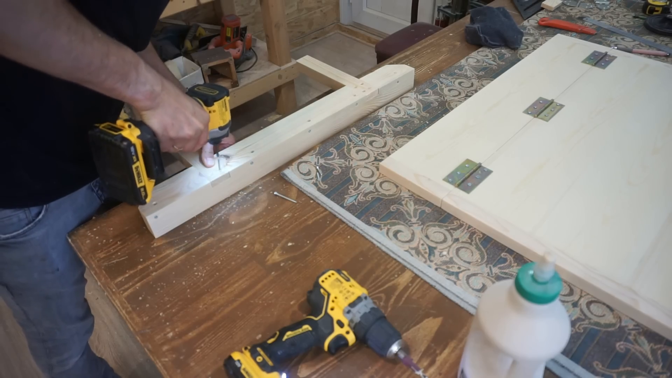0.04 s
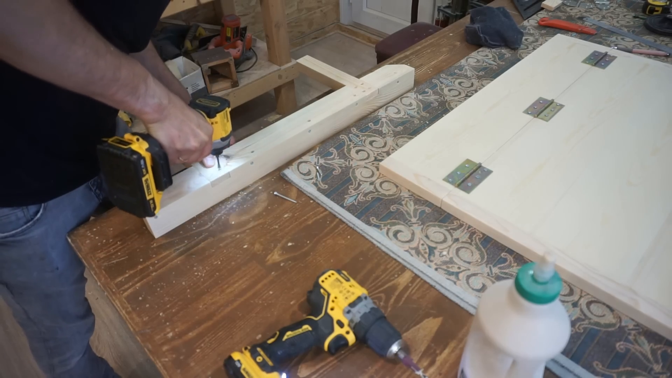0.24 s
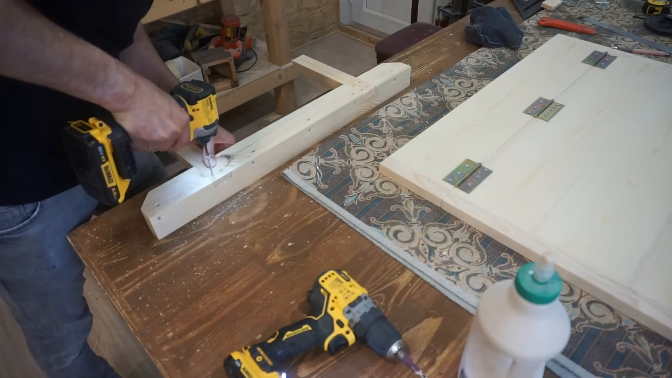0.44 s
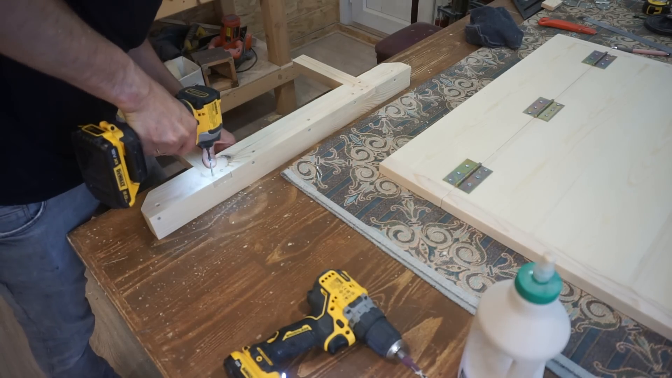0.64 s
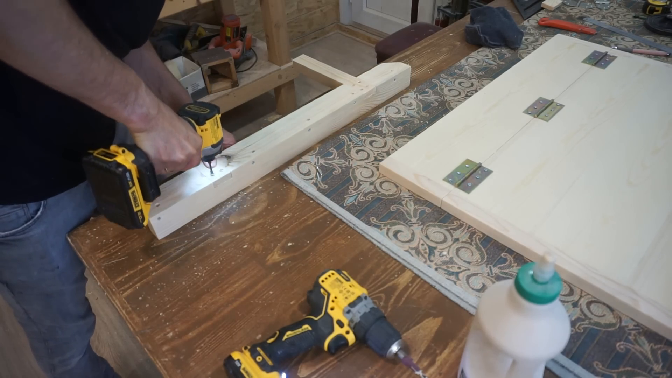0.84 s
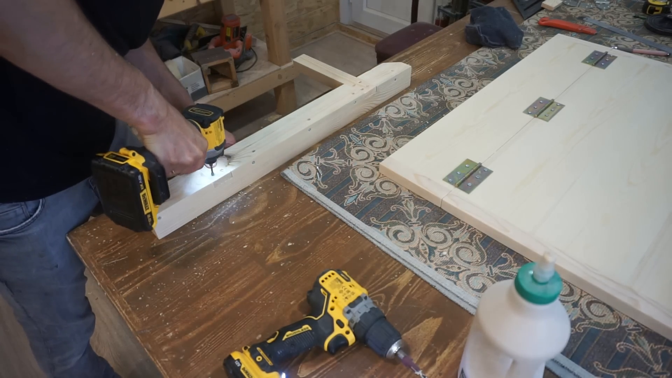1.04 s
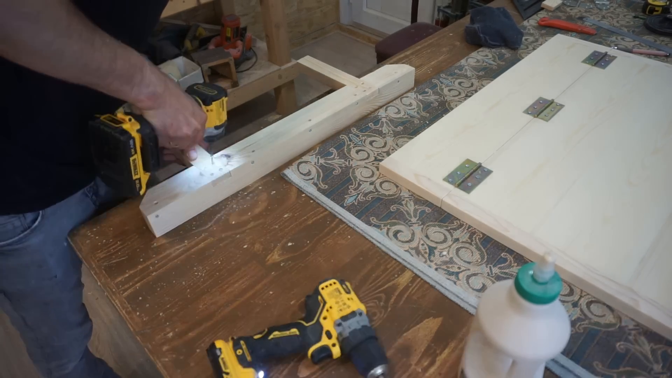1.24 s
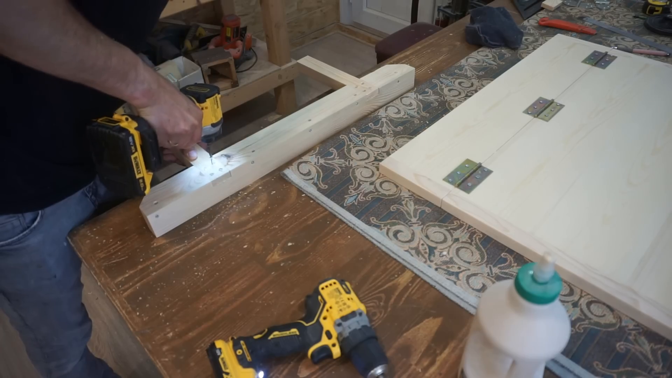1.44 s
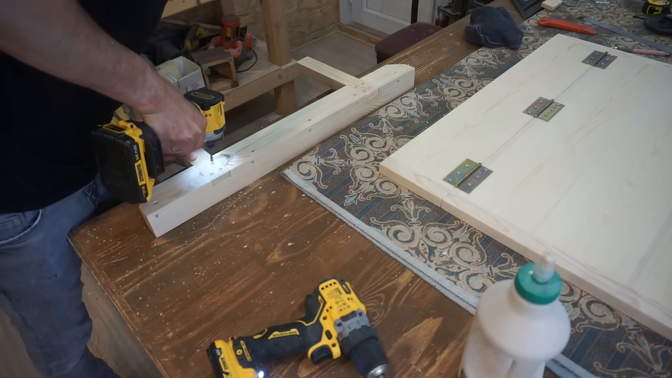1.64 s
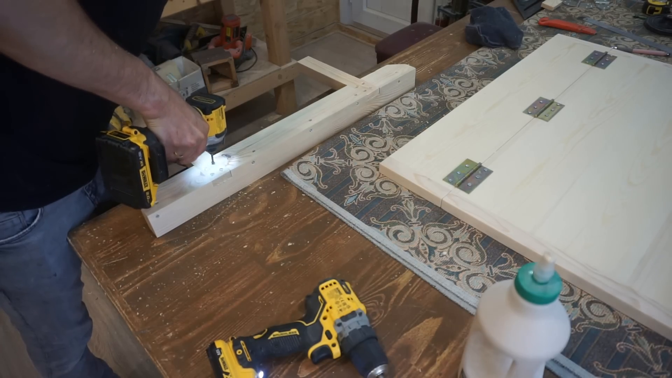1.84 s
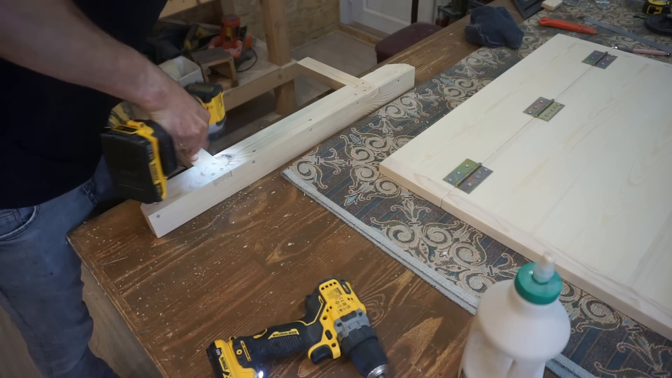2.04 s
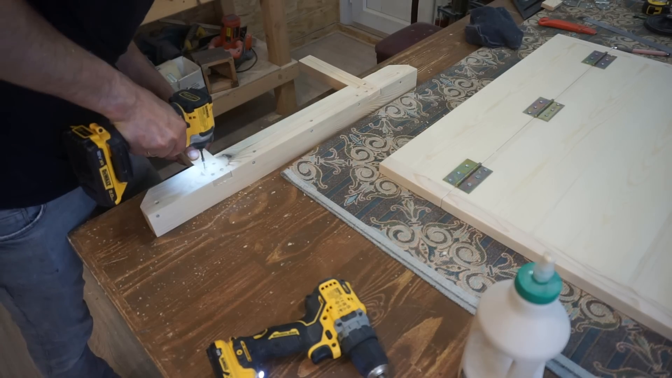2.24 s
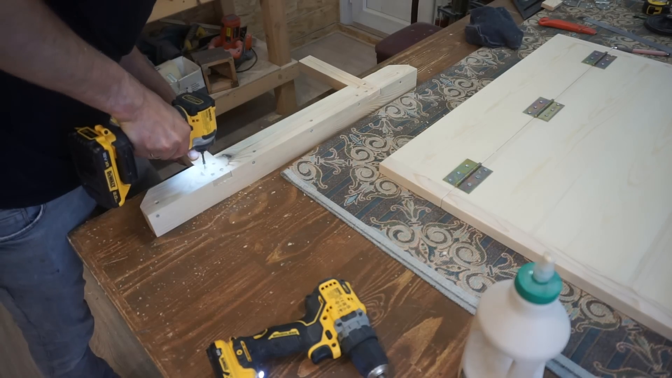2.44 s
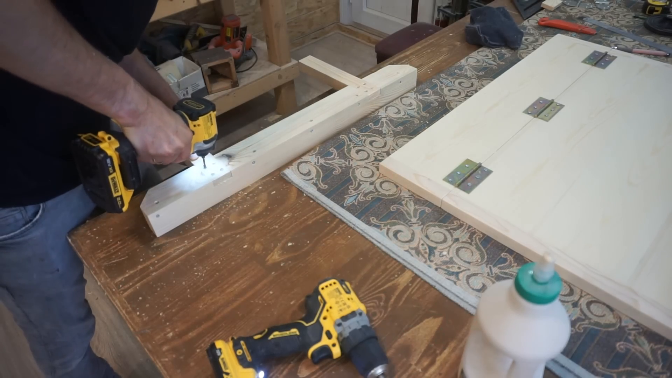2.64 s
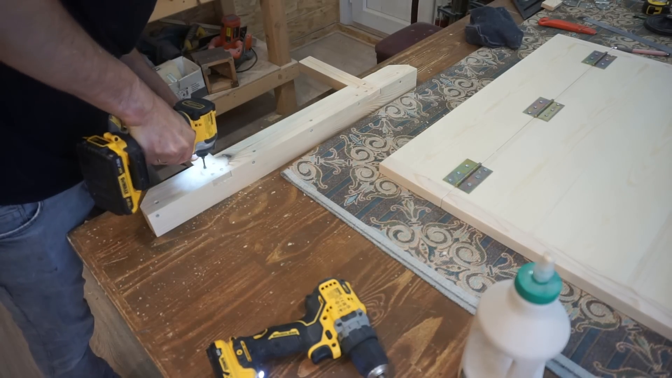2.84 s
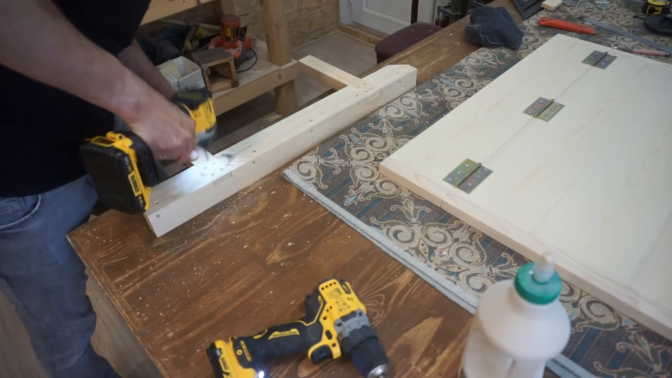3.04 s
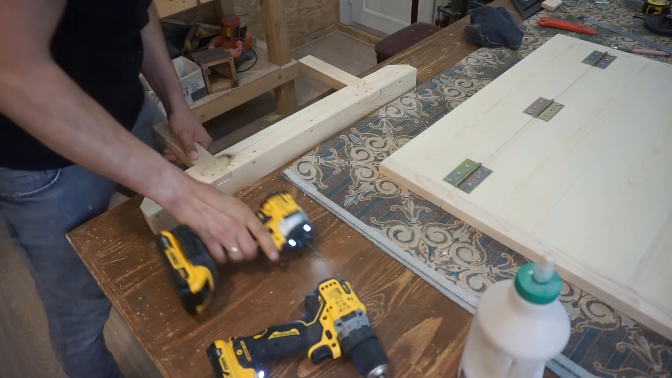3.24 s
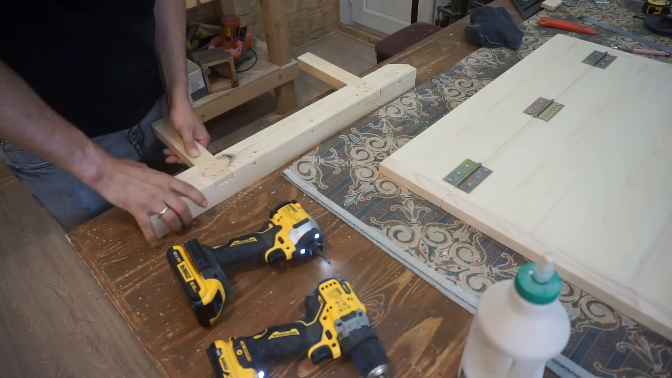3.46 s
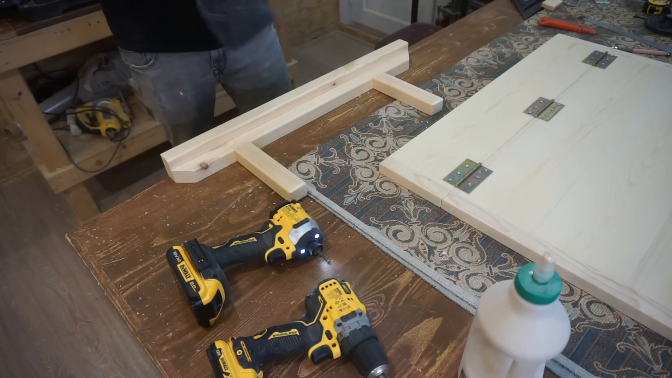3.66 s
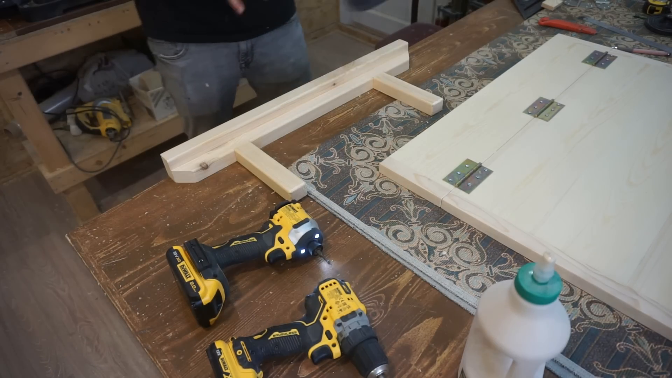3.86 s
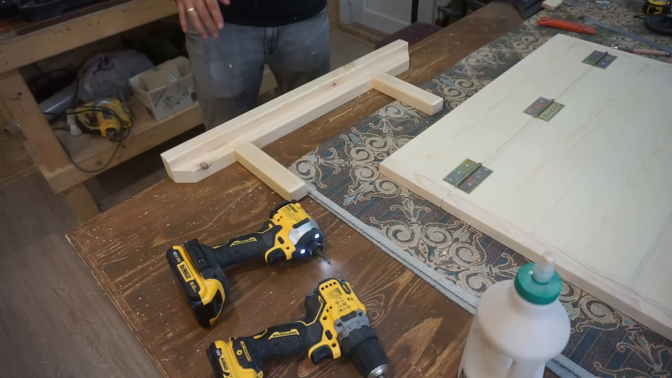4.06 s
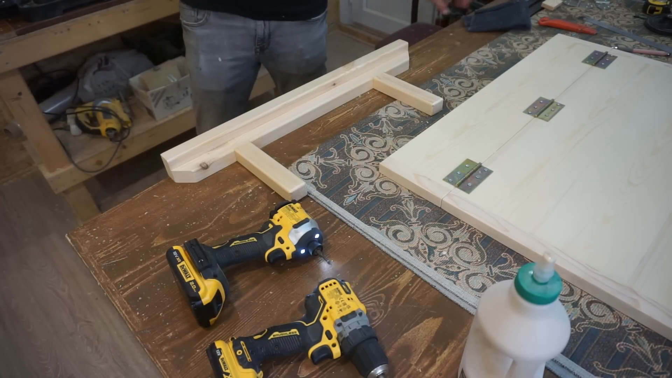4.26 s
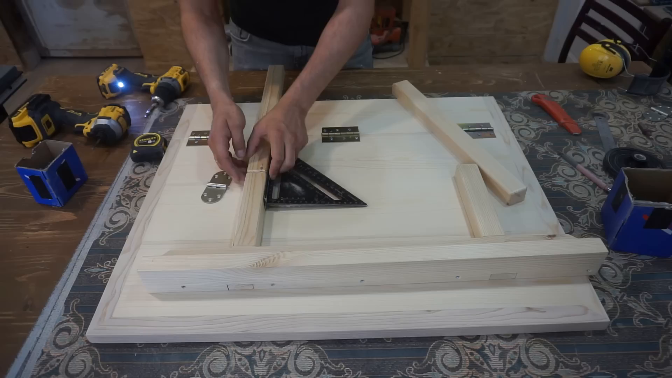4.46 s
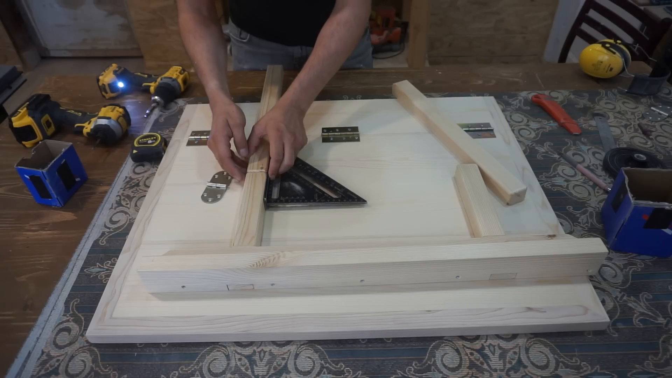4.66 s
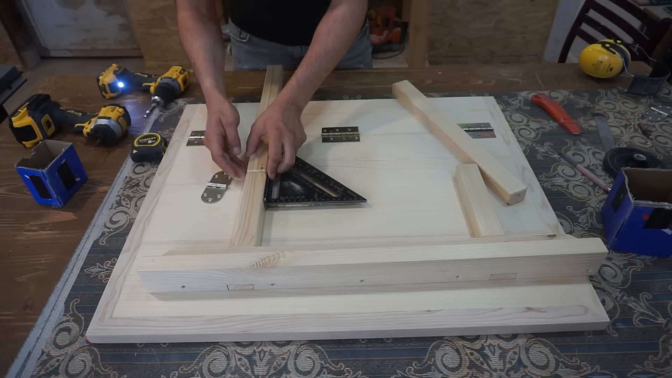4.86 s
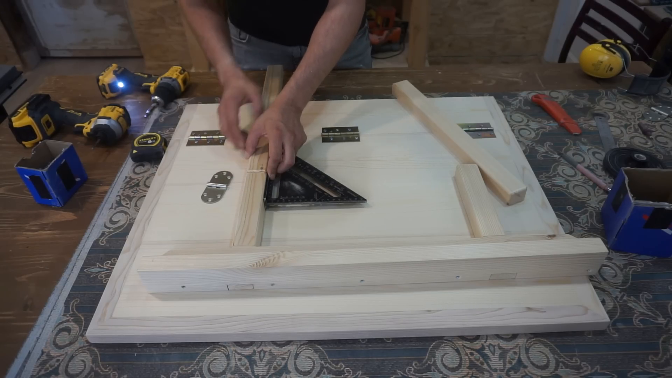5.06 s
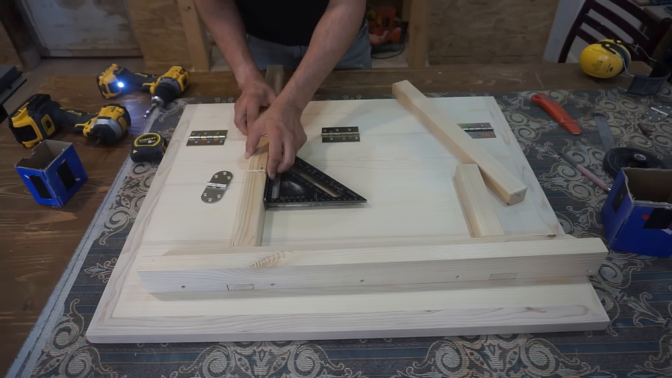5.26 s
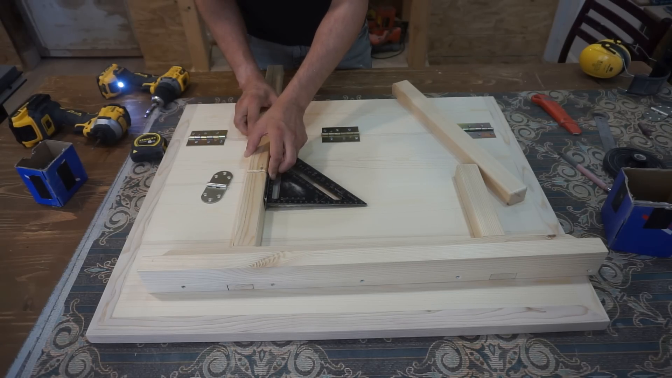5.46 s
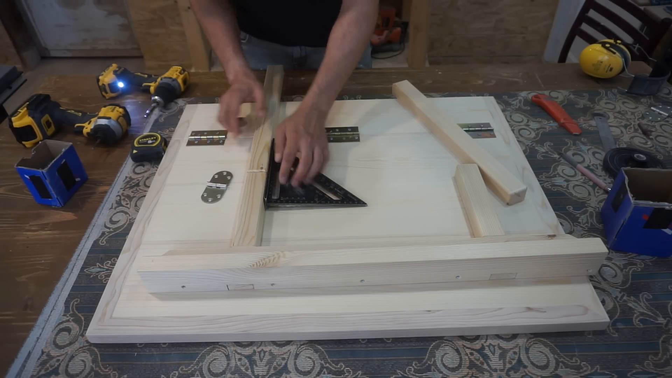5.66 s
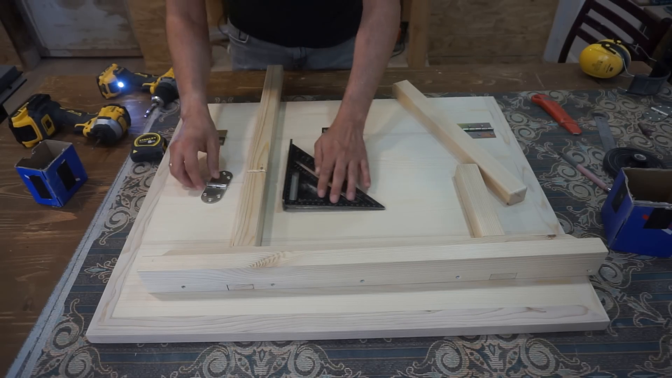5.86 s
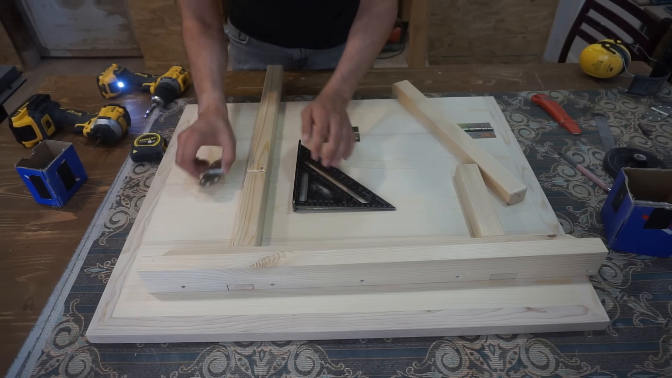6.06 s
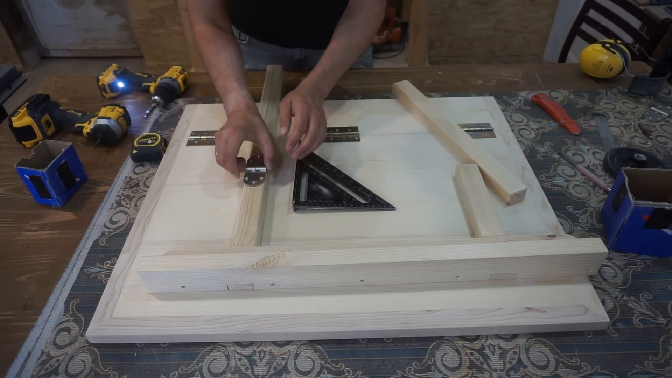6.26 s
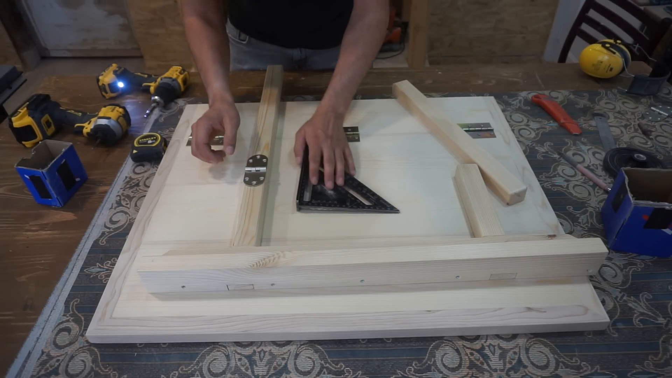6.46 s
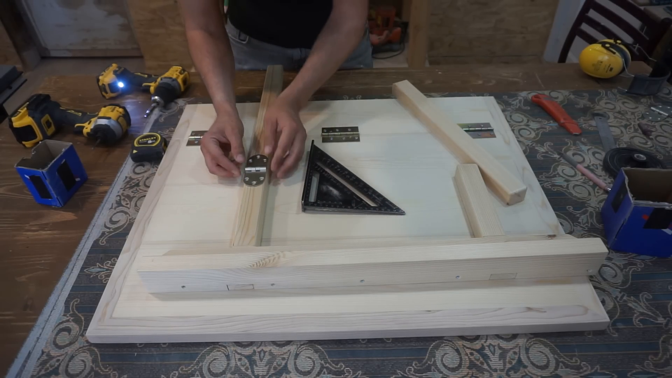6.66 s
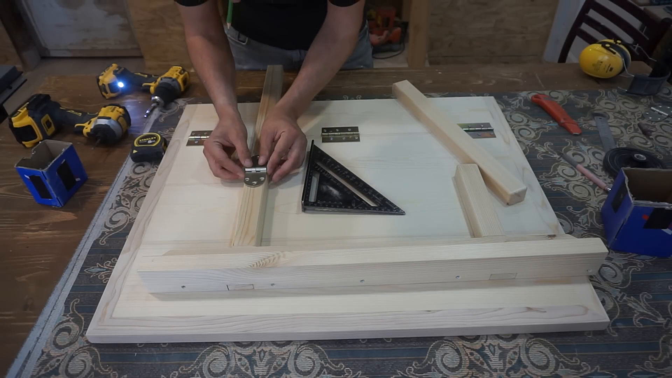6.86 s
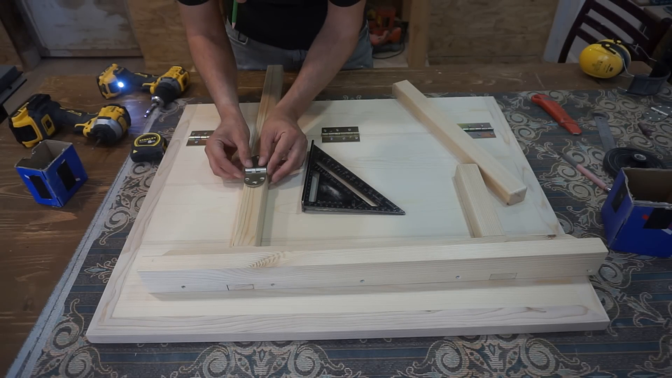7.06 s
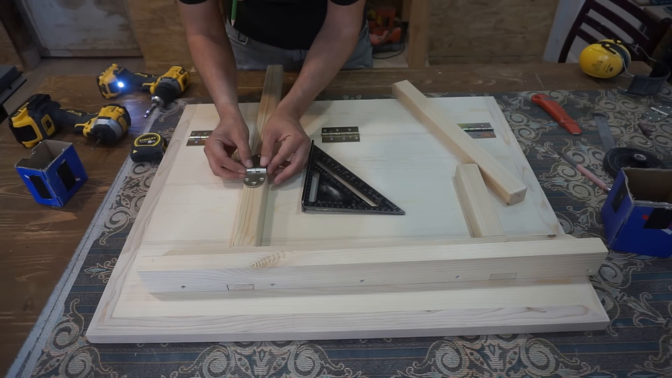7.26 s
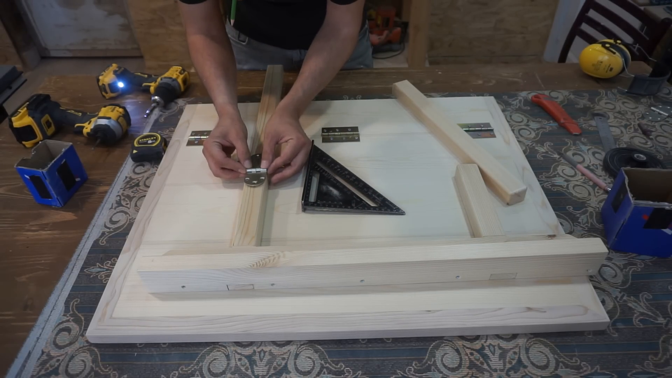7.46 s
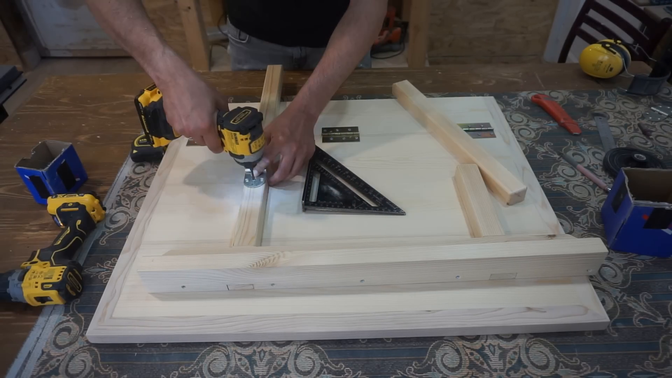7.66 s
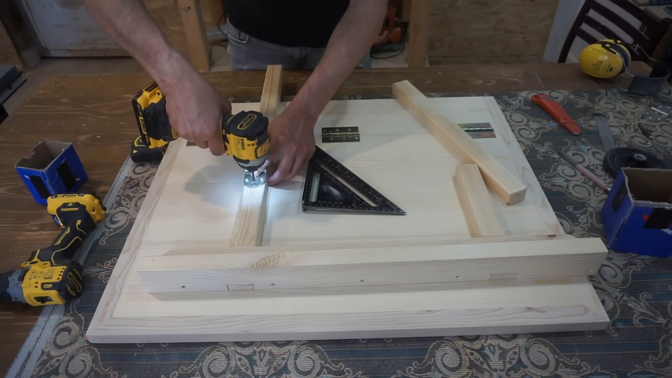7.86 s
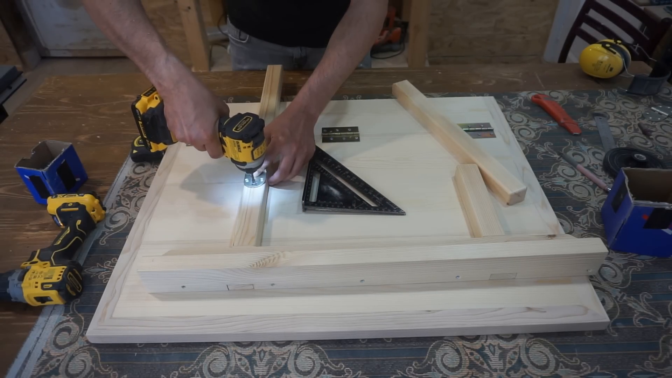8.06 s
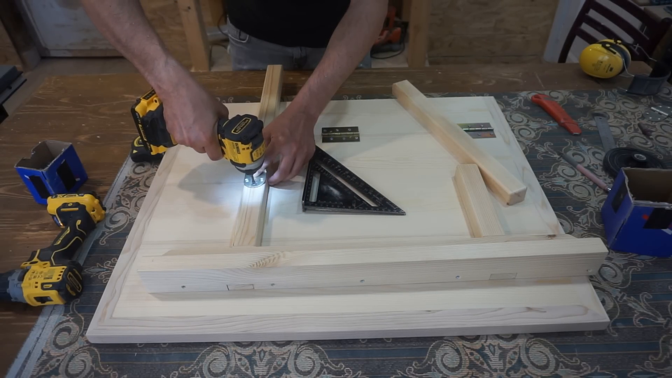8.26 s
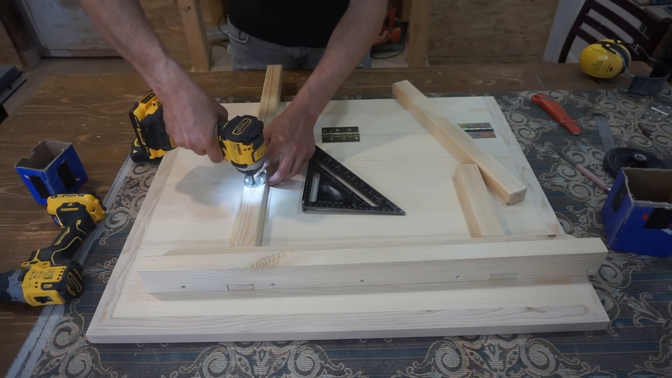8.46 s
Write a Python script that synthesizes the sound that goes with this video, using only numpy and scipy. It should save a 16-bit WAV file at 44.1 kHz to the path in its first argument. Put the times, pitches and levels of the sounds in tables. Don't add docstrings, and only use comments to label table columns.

```python
import sys
import numpy as np
from scipy import signal
from scipy.fft import rfft, irfft, next_fast_len
from scipy.io import wavfile
from scipy.ndimage import uniform_filter1d, map_coordinates

SR = 44100
rng = np.random.default_rng(int(sys.argv[2]) if len(sys.argv) > 2 else 0)


def gain_from_db(level_db):
    decades = np.asarray(level_db, float) / 20
    return 10 ** decades


def to_wav(sig):
    pcm = np.clip(np.atleast_2d(sig), -1, 1) * 32767
    pcm = np.round(pcm).astype(np.int16)
    wavfile.write(sys.argv[1], SR, pcm.T)


N = 375291
TIME = np.arange(N) / SR


def unit(x):
    return x / np.sqrt(np.mean(x ** 2) + 1e-20)


def along(points, hz):
    f, v = np.transpose(points)
    return np.interp(np.log(hz + 1), np.log(f + 1), v)


def played(tables):
    s, *cols = np.transpose(np.concatenate(tables))
    on = sum((TIME >= rows[0][0]) & (TIME < rows[-1][0]) for rows in tables)
    gate = uniform_filter1d(np.minimum(on, 1.), size=200)
    return [np.interp(TIME, s, c) for c in cols] + [gate]


def wobble(rate, times=TIME):
    knots = rng.standard_normal((2, int(N / SR * rate) + 4))
    return np.array([map_coordinates(k, [times * rate]) for k in knots])


def filtered(x, response):
    m = next_fast_len(x.shape[-1] + 8192)
    return irfft(rfft(x, m) * response(np.fft.rfftfreq(m, 1 / SR)), m)[..., :x.shape[-1]]


def modes(peaks):
    def response(f):
        return sum((-1) ** k * gain_from_db(db) * 1j * f * width / (hz * hz - f * f + 1j * f * width)
                   for k, (hz, width, db) in enumerate(peaks))
    return response


def grit(shape, spread_db):
    return unit(rng.standard_normal(shape) * gain_from_db(spread_db * rng.standard_normal(shape)))


def held(rows, rise_db=1800, fall_db=349):
    t = TIME[::16]
    shapes = [np.interp(t, [start - 1, start, stop, stop + 1],
                        [first_db - rise_db, first_db, last_db, last_db - fall_db])
              for start, stop, first_db, last_db in rows]
    return np.interp(TIME, t, gain_from_db(np.max(shapes, axis=0)))


def driver():
    # start_s, mesh_hz
    fast_mesh = [
        [(0, 2046), (.045, 1937), (.1, 1850), (.19, 1778)],
        [(0.195, 4169), (0.225, 4560), (0.309, 4310), (0.335, 4230)],
        [(0.572, 3956), (0.604, 4310), (0.618, 4430)],
        [(0.722, 3546), (0.74, 4510), (0.756, 4687), (0.814, 4430), (0.912, 4160), (0.955, 3948)],
        [(1.625, 2470), (1.643, 2685), (1.661, 2830), (1.807, 2573), (1.83, 2425)],
        [(2.44, 1735), (2.464, 1908), (2.56, 1811), (2.62, 1637), (2.72, 1585), (2.75, 1204), (2.775, 950)],
    ]
    fast_db = [-24, -21.5, -25, -24, -25.5, -23]
    # start_s, mesh_hz
    slow_mesh = [
        [(2.26, 608), (2.31, 596), (2.42, 561), (2.45, 564)],
        [(7.775, 614.3), (7.85, 597.4), (7.926, 573), (8.02, 555), (8.19, 531), (8.304, 499), (8.444, 431.7),
         (8.51, 386.3)],
    ]
    slow_db = [-33, -35.5]
    # start_s, mesh_hz
    spindle_mesh = [[(1.65, 7050), (1.69, 7370), (1.81, 6560)]]
    # freq_hz, level_db (per Hz)
    housing = [(1500, -34.5), (2600, -6), (3200, -6.5), (4400, -5.5), (5800, -2), (8500, 1.5), (10000, -6),
               (13000, -9.5), (16000, -18.5)]
    # freq_hz, level_db
    whine_colour = [(1500, -14), (2800, -5), (4500, -1.5), (6200, -2), (8500, 2), (11000, -7.5),
                    (14000, -14), (16500, -49)]
    # freq_hz, level_db
    growl_colour = [(580, -10), (800, 7.5), (1150, 5.5), (1650, -4.5), (2150, 2.5), (3200, -8), (4300, 10),
                    (5200, -2), (7500, 1.5), (12000, -24)]
    # freq_hz, level_db (per Hz)
    rail = [(290, -28), (500, -9), (728, -9), (831, -2), (970, -5), (1200, 1), (1580, -8), (1940, 1),
            (3270, -5), (4450, -15), (7000, -23), (9100, -54), (15400, -120)]
    # freq_hz, width_hz, level_db
    housing_ring = [(4420, 1290, 0)]
    # freq_hz, width_hz, level_db
    bench_thrum = [(360, 327, -1), (530, 590, 0)]

    rush_gain, ring_gain, wood_gain, bench_gain = trigger()
    teeth = grit((2, N), 3.5)
    rush = rush_gain * gain_from_db(-2.5) * unit(filtered(teeth, lambda f: gain_from_db(along(housing, f))))
    ring = ring_gain * gain_from_db(-2.5) * unit(filtered(teeth, lambda f: modes(housing_ring)(f) ** 2))
    slips = gain_from_db(2.34 * wobble(160)[0]) * grit((2, N), 3.3)
    wood = wood_gain * gain_from_db(-3.0) * unit(filtered(slips, lambda f: gain_from_db(along(rail, f))))
    bench = bench_gain * gain_from_db(-3) * unit(filtered(slips, lambda f: modes(bench_thrum)(f) ** 2))

    gears = whine(fast_mesh, fast_db, whine_colour, offset_db=0.5, flutter=0.32, rough=0.55, count=8,
                  late_db=6, late_s=0.029)
    gears += whine(slow_mesh, slow_db, growl_colour, offset_db=9, flutter=0.11, rough=0.25, count=20,
                   late_db=15, late_s=0.1)
    gears += whine(spindle_mesh, [-32], whine_colour, offset_db=-1.0, flutter=0.28, rough=0.3, count=1)
    return rush + ring + wood + bench + gears


def trigger():
    # start_s, stop_s, motor_start_db, motor_stop_db, wood_db
    full_pulls = [
        (0, .19, -28, -20, -35),
        (.195, .335, -28, -23, -34.5),
        (.555, .6, -21, -21.5, -30),
        (.713, .95, -23.5, -28.5, -36),
        (1.618, 1.645, -18, -19.5, -26),
        (1.645, 1.825, -27.5, -22.5, -35.5),
        (2.44, 2.76, -25, -24, -36.5),
    ]
    # start_s, stop_s, motor_start_db, motor_stop_db, wood_db
    half_pulls = [
        (1.385, 1.604, -31.5, -25.5, -32),
        (2.27, 2.446, -32, -25.5, -38),
        (2.904, 3.056, -32.5, -42.5, -37.5),
        (7.801, 8.521, -28.5, -26, -39),
    ]
    # start_s, stop_s, motor_start_db, motor_stop_db, wood_db
    touch = [
        (0.47, 0.478, -26.5, -18, -40.5),
    ]
    # start_s, stop_s, wood_start_db, wood_stop_db
    bites = [(0.561, 0.559, -18, -31), (.54, 0.553, -33.5, -39), (0.946, 1.001, -19, -17),
             (1.08, 1.16, -18, -22.5), (1.826, 1.889, -21, -18), (1.983, 1.995, -20.5, -38),
             (1.993, 2.062, -19, -18)]

    def motor(rows, **speed):
        return held([row[:4] for row in rows], **speed)

    def load(rows, **speed):
        return held([(start, stop, db, db) for start, stop, _, _, db in rows], **speed)

    cut_db = 4000
    full = motor(full_pulls)
    half = np.maximum(motor(half_pulls), motor(touch, fall_db=cut_db))
    thread = np.maximum(load(full_pulls + half_pulls), load(touch, fall_db=cut_db))
    bite = held(bites, rise_db=1600, fall_db=403)
    stall = held([(start, stop, db - 5, db - 5 - 10.5) for start, stop, db, _ in bites])
    idle = held([(start, stop, first, last - 11) for start, stop, first, last, _ in half_pulls + touch],
                fall_db=2 * 349)
    ring = gain_from_db(3.4 * wobble(14)[0]) * np.maximum(gain_from_db(-11) * full, gain_from_db(-2) * idle)
    thrum_db = np.where(TIME < 2.2, -5, -10.5)
    bench = gain_from_db(thrum_db + 3.3 * wobble(14)[0]) * thread
    return (np.max([full, half, stall], axis=0), np.maximum(ring, gain_from_db(-13) * bite),
            np.maximum(thread, bite), np.maximum(bench, gain_from_db(-13) * bite))


def whine(tables, levels_db, colour, offset_db, flutter, rough, count, late_db=0, late_s=1):
    mesh_hz, on = played(tables)
    starts = np.array([rows[0][0] for rows in tables])
    row = np.maximum(np.searchsorted(starts, TIME) - 1, 0)
    since = np.abs(TIME - starts[row])
    db = uniform_filter1d(np.asarray(levels_db, float)[row], size=200) - late_db * np.exp(-since / late_s)
    live = on > 0
    t, hz = TIME[live], mesh_hz[live]
    turns = 2 * np.pi * np.cumsum(hz) / SR
    slipping = 1 + 0.23 * np.clip(np.abs(np.gradient(np.log(hz))) * SR - 2.5, 0, 5)
    error = flutter * slipping * (wobble(70, t) + 2.1 * wobble(260, t))
    beat = gain_from_db(3.16 * wobble(45, t)) + rough * (wobble(400, t) + 0.14 * wobble(1600, t))
    sizes = [gain_from_db(along(colour, k * hz)) * (k * hz < SR / 2.7) for k in range(1, count + 1)]
    tones = 0
    for k, size in enumerate(sizes, 1):
        own_beat = np.roll(beat, k * SR // count // 2, axis=1)
        tones = tones + size * own_beat * np.sin(k * turns + k ** 0.64 * error + k * k)
    shaking = gain_from_db(0.5 * uniform_filter1d(slipping - 1, size=300))
    out = np.zeros((2, N))
    out[:, live] = shaking * tones / np.sqrt(np.sum(np.square(sizes), axis=0) / 2)
    return on * gain_from_db(db + offset_db) * out


def knocks():
    # start_s, peak_db, ring_hz, brightness_db, ring_db
    strikes = [(0.554, -23, 2340, -6, -1.5), (0.95, -26, 1140, -16, -12), (1.523, -21, 780, -3.5, -8),
               (1.826, -19, 1142, -23, -3), (2.226, -27, 1560, -12.5, -1.5), (2.824, -28, 605, -32, 2.5),
               (3.094, -30, 460, -15, 8), (3.093, -35, 4700, -8, 4), (3.349, -24.5, 562, -31, 18.5),
               (3.36, -13, 1080, -28, 10), (4.163, -41, 745, -18, -9), (4.584, -45.5, 547, -41, -1),
               (4.63, -57, 2190, -30, 14), (5.424, -9.5, 1300, -3.5, -2), (6.298, -30.5, 1210, -8.5, 1.5),
               (7.769, -35, 1180, -11, 5)]
    # freq_hz, level_db (per Hz)
    board = [(59, -70), (100, -30), (186, -24), (451, -2), (713, -2), (1130, -6.5), (1640, -10.5),
             (2560, -7.5), (3910, -22), (5000, -25), (6500, -43), (11000, -120)]
    out, t = np.zeros((2, N + SR)), np.arange(SR // 4) / SR
    for s, db, hz, bright_db, ring_db in strikes:
        shake = grit((2, len(t)), 1.35) * gain_from_db(-60 * np.maximum(t - 0.016, 0) / 0.15)
        shake += 2.1 * gain_from_db(-60 * t / 0.008) * rng.standard_normal(len(t))
        part = modes([(hz, 0.4 * hz, 0)])
        body = filtered(shake, lambda f: gain_from_db(along(board, f)) + gain_from_db(ring_db) * part(f) ** 2)
        crack = filtered(shake, lambda f: 1j * f / (1j * f + 3000) * (7000 / (1j * f + 7000)) ** 2)
        knock = unit(body) + gain_from_db(bright_db - 0.5) * unit(crack)
        out[:, round(s * SR):][:, :len(t)] += gain_from_db(db - 13.0) * knock
    return out[:, :N]


def slides():
    # start_s, stop_s, start_db, stop_db
    pushes = [
        (5.85, 5.89, -38, -38.5),
        (5.915, 5.975, -32.5, -34),
        (6.495, 6.57, -40, -37),
    ]
    # freq_hz, width_hz, level_db
    slid_wood = [(1090, 126, -0.5), (1375, 81, -3), (1840, 520, -13), (2330, 46, -10), (2510, 120, -13)]
    # freq_hz, width_hz, level_db
    hinge = [(3640, 110, -15), (4350, 45, -2), (4670, 110, -7), (5620, 28, 0), (5930, 28, -4),
             (7130, 150, -11), (7640, 71, -6), (8850, 54, -8), (10600, 26, -4), (12900, 50, 0.5)]
    drag = gain_from_db(0.34 * wobble(60)[0]) * grit((2, N), 2.9)
    wood = unit(filtered(drag, modes(slid_wood)))
    metal = unit(filtered(drag, lambda f: modes(hinge)(f) + 0.026))
    return held(pushes, rise_db=280, fall_db=502) * (wood + gain_from_db(-9.5) * metal)


def room(x, wet_db):
    # freq_hz, t60_s
    decay = [(200, 0.22), (1000, 0.21), (4000, 0.15), (12000, 0.12)]
    hz, t, z = signal.stft(rng.standard_normal((2, SR // 3)), SR, nperseg=256)
    tail = signal.istft(z * gain_from_db(-60 * t / along(decay, hz)[:, None]), SR, nperseg=256)[1]
    tail /= np.linalg.norm(tail[0])
    late = np.pad(x, ((0, 0), (150, 0)))
    return x + gain_from_db(wet_db) * signal.oaconvolve(late, tail, axes=1)[:, :N]


def thumps():
    # start_s, peak_db
    low_thumps = [
        (1.304, -60),
        (4.484, -58),
        (7.7, -66),
        (8.496, -46),
    ]
    out, t = np.zeros(N + SR), TIME[:SR // 20]
    for s, db in low_thumps:
        out[round(s * SR):][:len(t)] += gain_from_db(db + 14 - 60 * t / 0.0065)
    return out[:N]


def floor():
    # freq_hz, width_hz, level_db
    machine = [(437.4, 16.4, -5), (657, 85, -2.5), (1324, 140, 7), (2606, 190, -7), (4540, 63, -9)]
    # freq_hz, level_db (per Hz)
    air_colour = [(40, -55), (100, -19), (390, -13.5), (700, -4.5), (1300, 7.5), (2600, -5.5), (16000, -6)]
    # start_s, buzz_db
    lift = [(0, -66), (1.3, -57.5), (2.2, -59), (3.17, -60.5), (3.45, -60.5), (3.74, -57.5), (4.1, -53.5),
            (4.485, -52), (4.49, -60), (5.0, -58.5), (5.4, -55.5), (5.9, -52), (6.3, -53.5), (6.66, -52.5),
            (7.69, -54), (7.7, -56.5), (8.51, -59)]
    buzz_hz = 50
    buzz_db, _ = played([lift])
    hum_mode, frame_mode, panel, *small = machine
    at = np.round((np.arange(int(N / SR * buzz_hz)) / buzz_hz + 0.0165) * SR).astype(int)
    blows = np.zeros(N)
    blows[at] = (-1.) ** np.arange(len(at)) * gain_from_db(0.52 * rng.standard_normal(len(at)))
    puff_shape = signal.fftconvolve(np.abs(blows), gain_from_db(-60 * TIME[:SR // 20] / 0.031))[:N]
    puffs = unit(puff_shape * rng.standard_normal((2, N)))
    drone = rng.standard_normal((2, N))
    frame = unit(filtered(40 * blows + 0.83 * drone,
                          lambda f: modes([frame_mode])(f) * (1j * f / (1j * f + 450)) ** 2))
    casing = 0.73 * unit(filtered(drone + 1.16 * puffs + 12 * blows, modes([panel])))
    casing += 0.37 * unit(filtered(0.27 * drone + 0.58 * puffs + 15 * blows,
                                   lambda f: modes(small)(f) * 3500 / (3500 + 1j * f)))
    hum = 0.42 * (TIME > 4.488) * unit(filtered(drone, modes([hum_mode, (330, 200, -21)])))
    air = filtered(rng.standard_normal((2, N)), lambda f: gain_from_db(along(air_colour, f)))
    air /= np.std(filtered(air[0], lambda f: f > 5000))
    hiss_db = buzz_db - 5.5 - 1.5 * (TIME < 3.5) + 4.5
    return gain_from_db(buzz_db + 1.5) * (frame + hum + gain_from_db(1.5) * casing) + gain_from_db(hiss_db) * air


def scene():
    # freq_hz, left_right_likeness
    alike = [(100, 0.89), (700, 0.92), (1400, 0.71), (2800, 0.24), (6000, 0.012), (12000, -0.29)]
    gap = gain_from_db(np.interp(TIME, [0.482, 0.482 + 0.0015, 0.508, 0.508 + 0.02], [0, -48, -48, 0]))
    pair = gap * room(driver() + knocks() + slides(), wet_db=-5.0) + floor()

    def turn(f):
        return np.arccos(np.clip(along(alike, f), -1, 1)) / 2

    mid, side = filtered(pair, lambda f: np.array([np.cos(turn(f)), np.sin(turn(f))]))
    return np.array([mid + side, mid - side])


def band_limit(x):
    return signal.sosfilt(signal.butter(12, 16670, fs=SR, output="sos"), x)


def record(dry):
    # freq_hz, left_over_right_db
    lean = [(300, 0.2), (2800, 1), (5000, -1.5), (9000, 2.5), (14000, -1.5)]

    def ports(f):
        bass_cut = (1j * f / (1j * f + 130)) ** 2
        return bass_cut * (f < 16000) * gain_from_db(np.outer([0.5, -0.5], along(lean, f)))

    x = filtered(dry, ports) + thumps()
    level = np.sqrt(np.abs(uniform_filter1d(np.mean(x ** 2, axis=0), size=260)))
    return band_limit(x / (1 + (level / 0.14) ** 4) ** 0.21)


dry = scene()
out = record(dry)
to_wav(out)
```